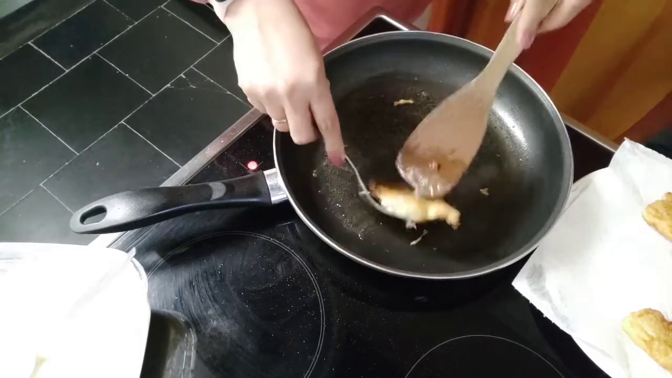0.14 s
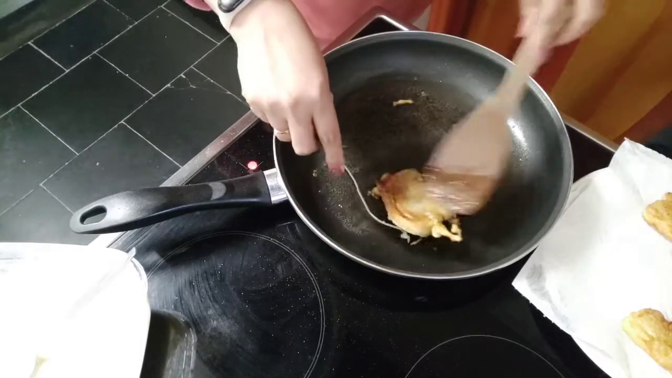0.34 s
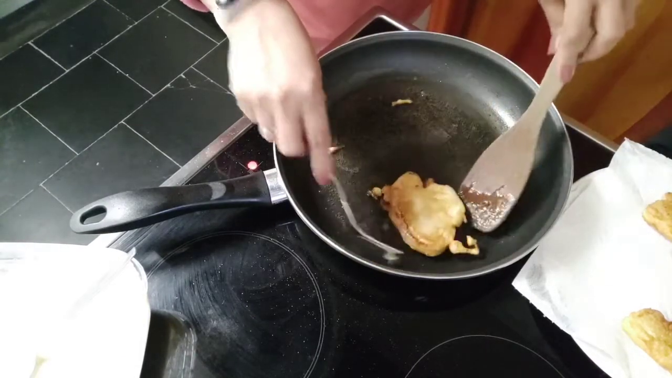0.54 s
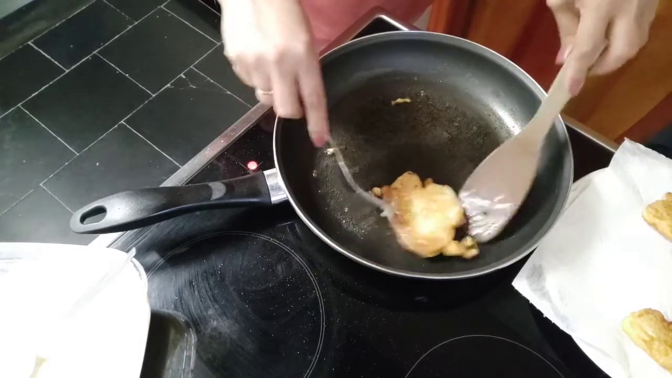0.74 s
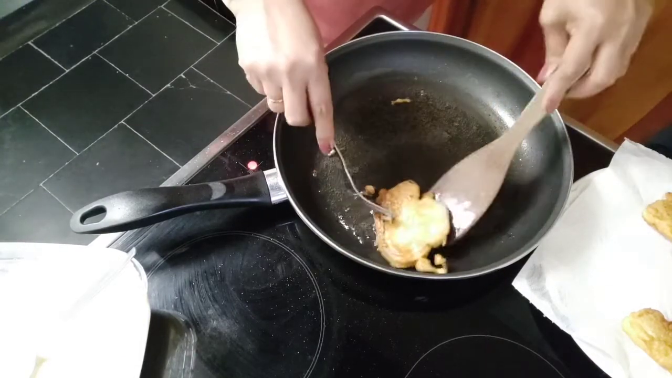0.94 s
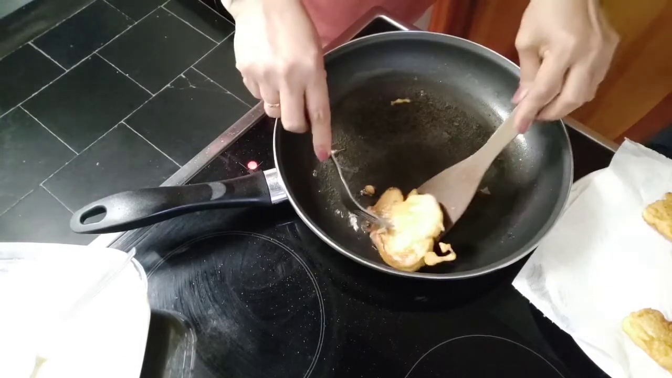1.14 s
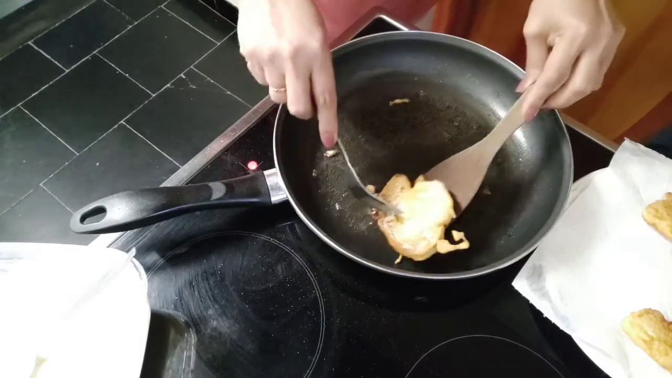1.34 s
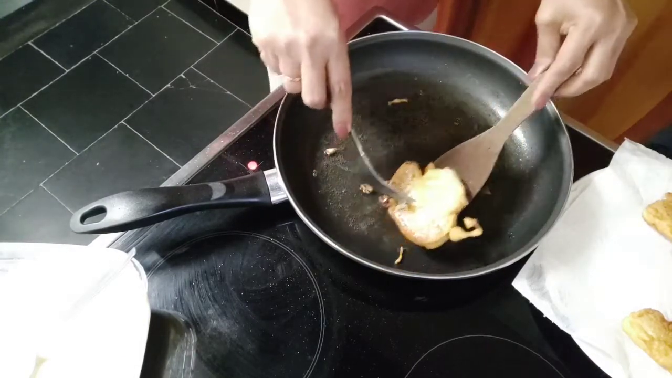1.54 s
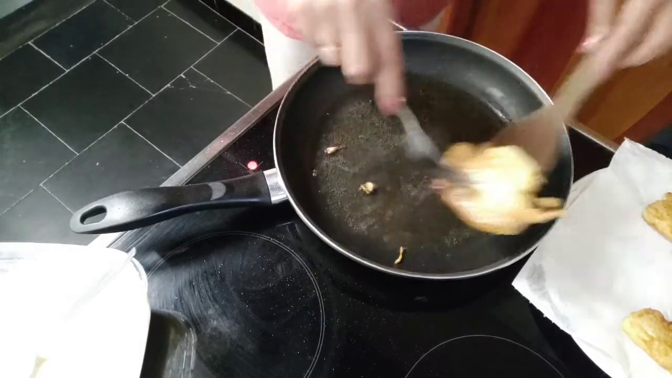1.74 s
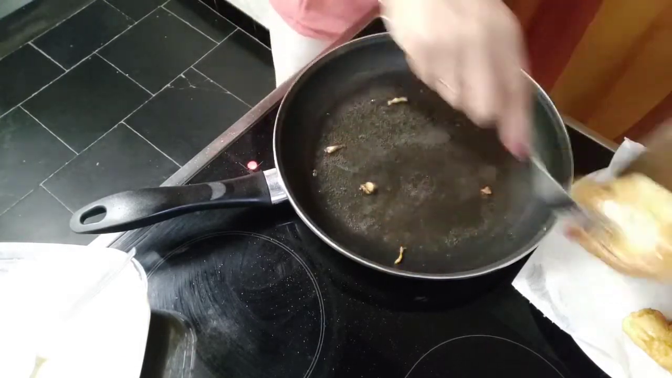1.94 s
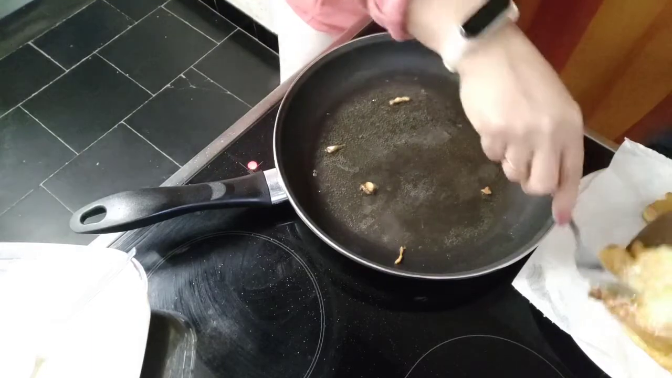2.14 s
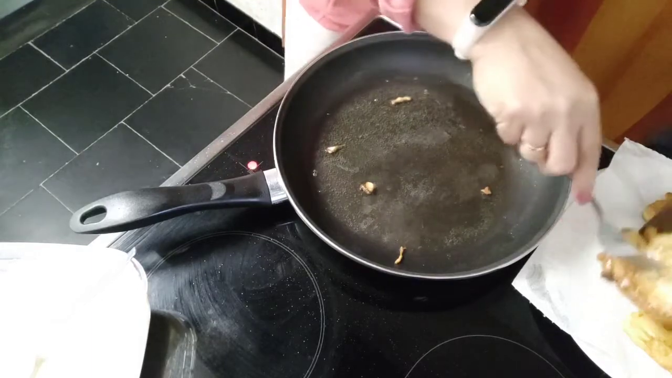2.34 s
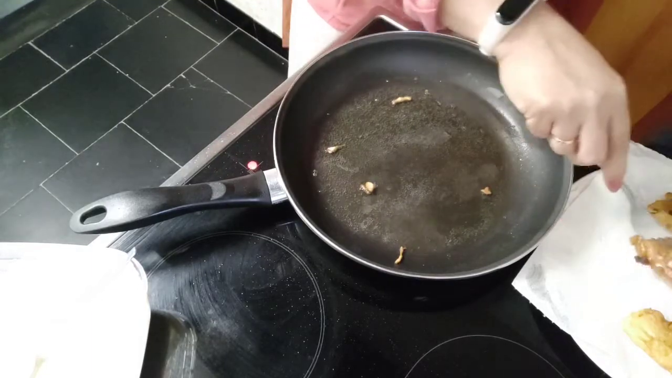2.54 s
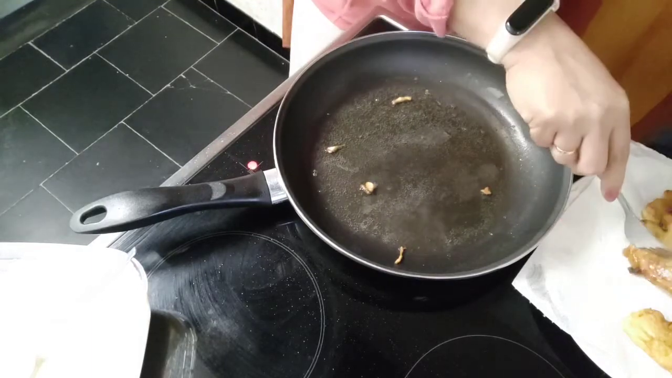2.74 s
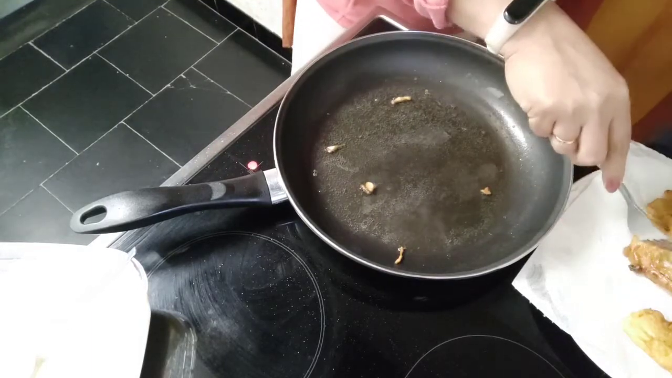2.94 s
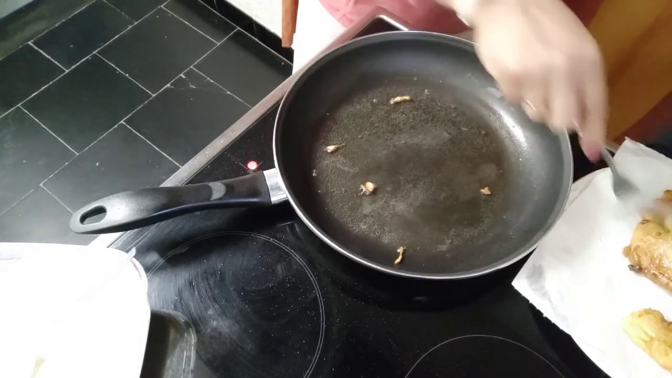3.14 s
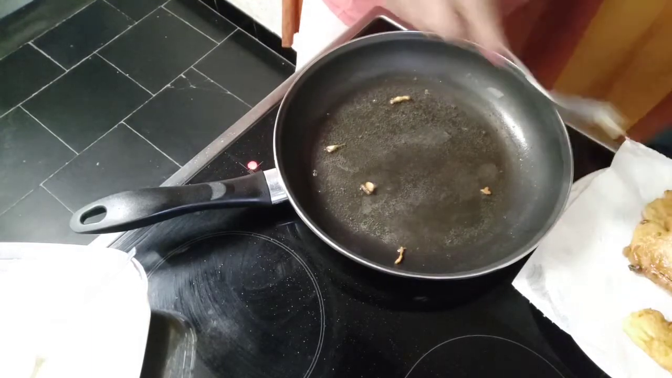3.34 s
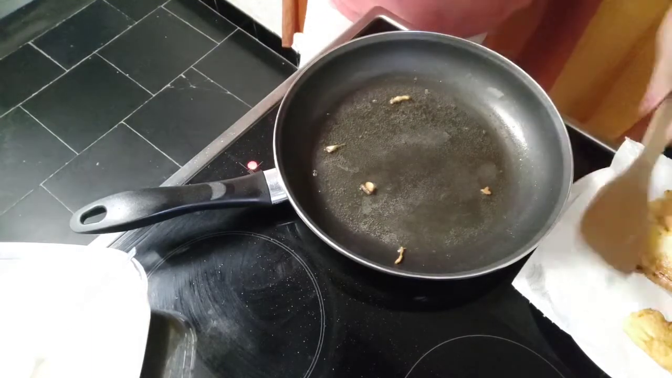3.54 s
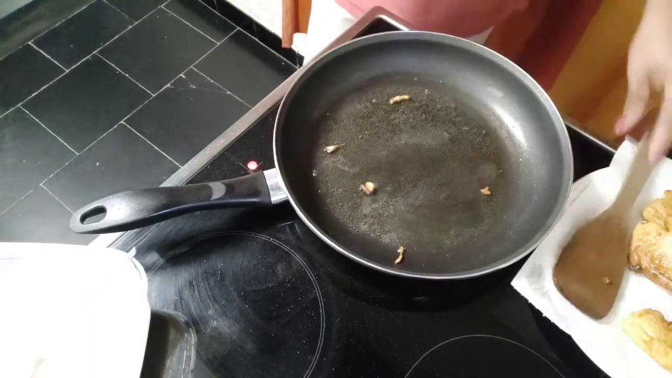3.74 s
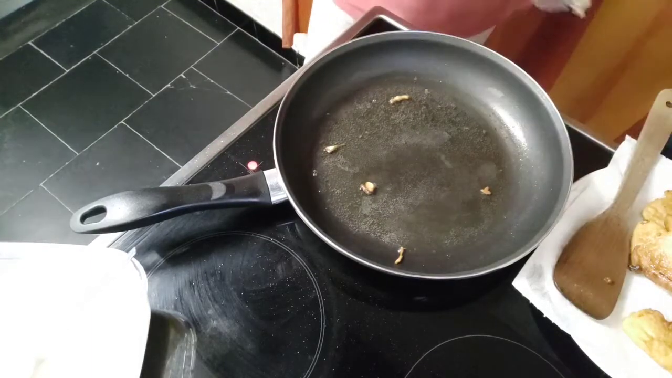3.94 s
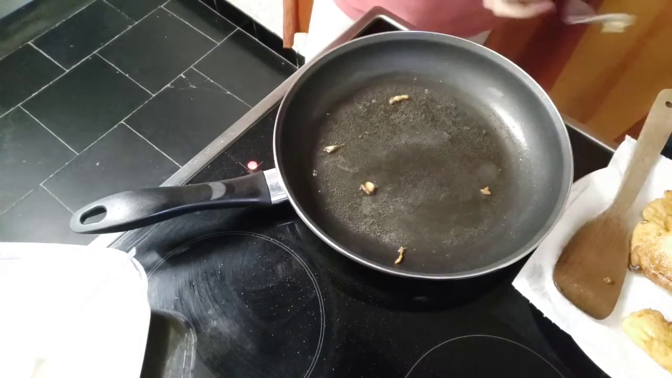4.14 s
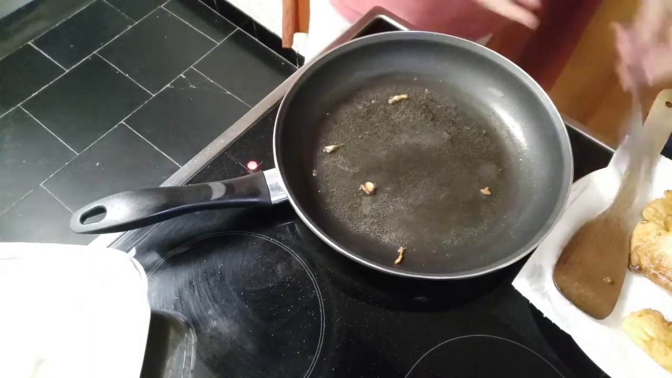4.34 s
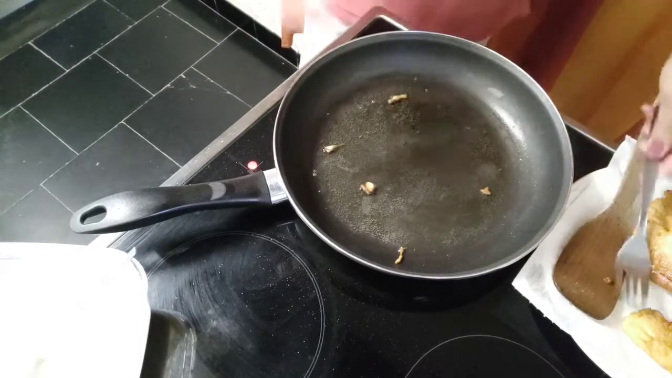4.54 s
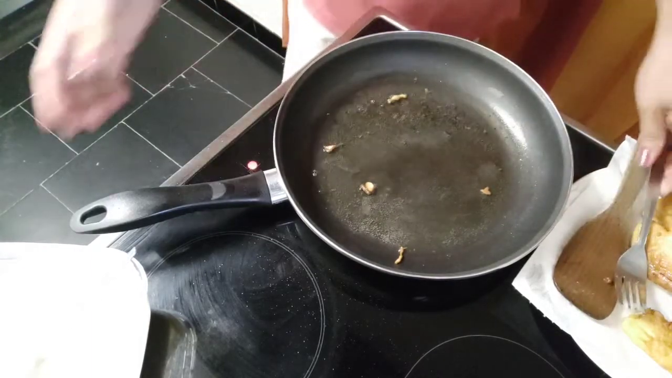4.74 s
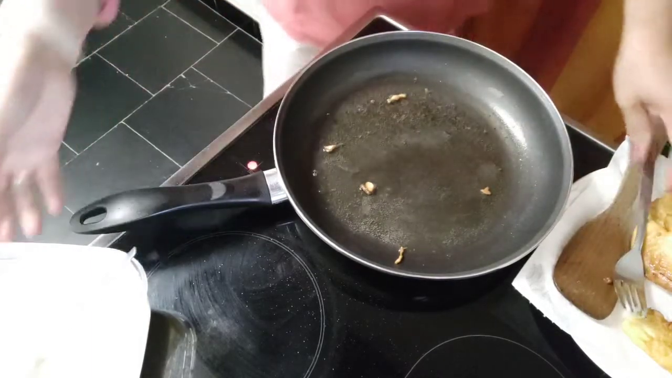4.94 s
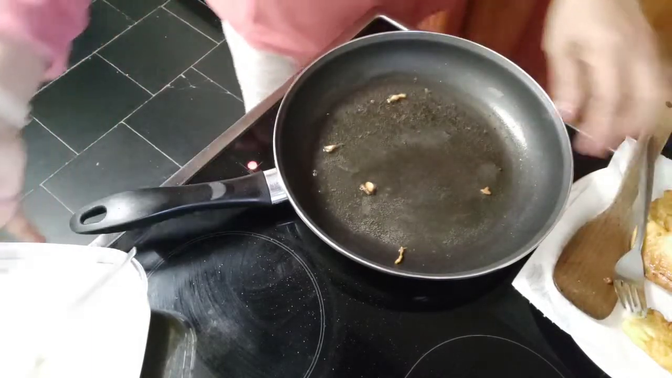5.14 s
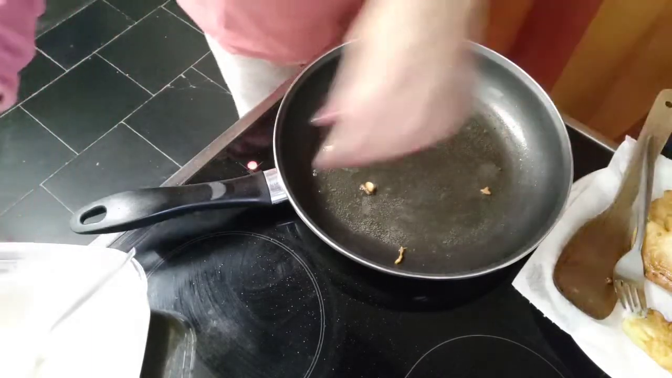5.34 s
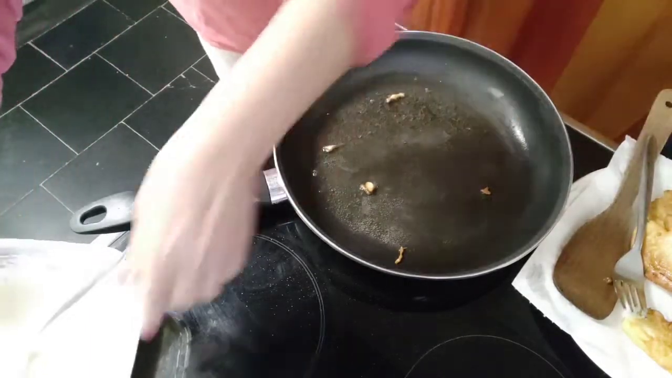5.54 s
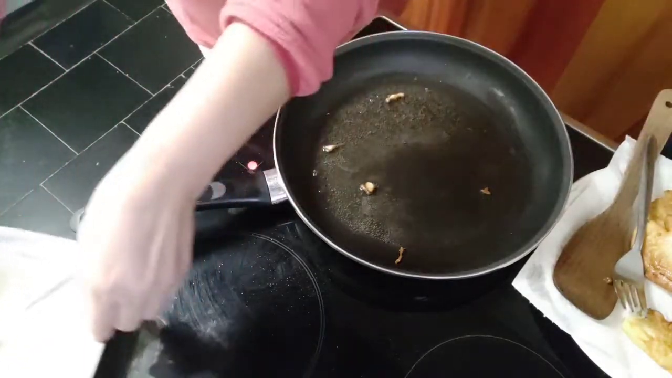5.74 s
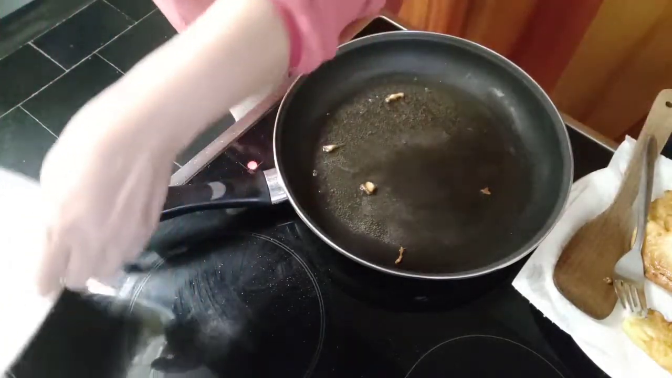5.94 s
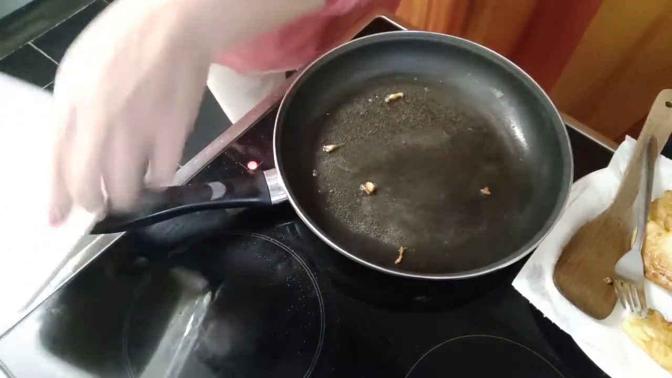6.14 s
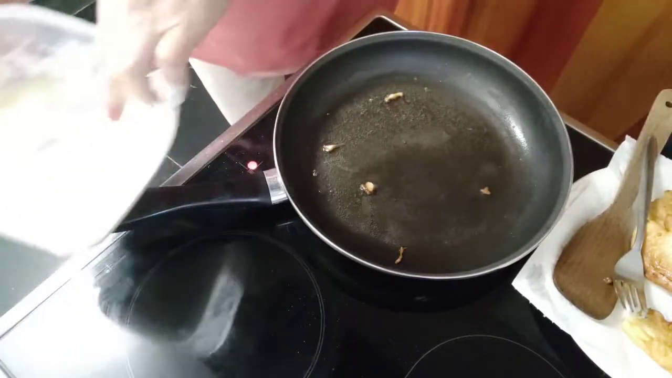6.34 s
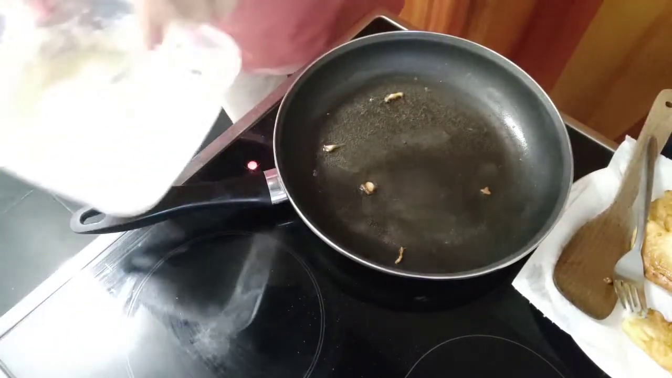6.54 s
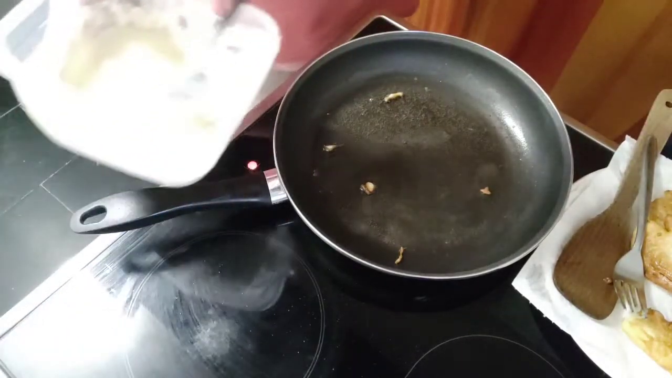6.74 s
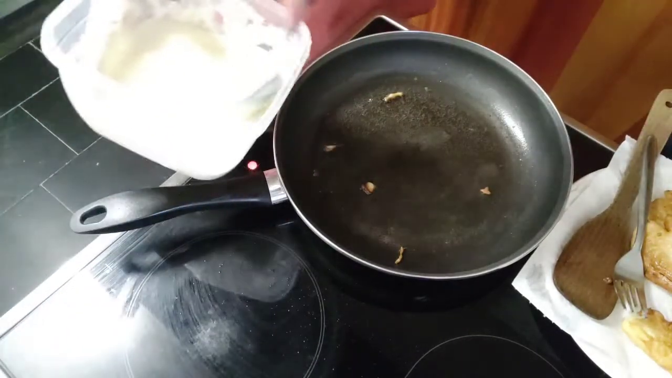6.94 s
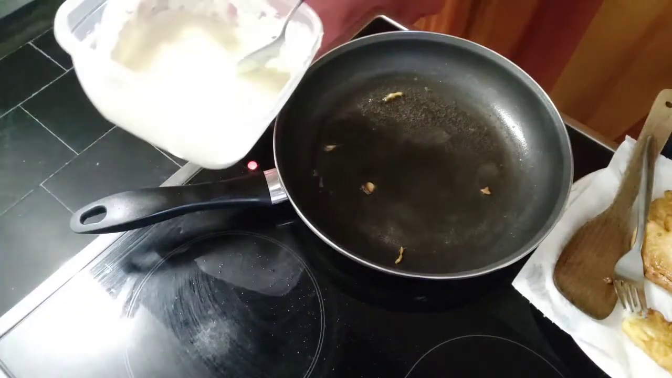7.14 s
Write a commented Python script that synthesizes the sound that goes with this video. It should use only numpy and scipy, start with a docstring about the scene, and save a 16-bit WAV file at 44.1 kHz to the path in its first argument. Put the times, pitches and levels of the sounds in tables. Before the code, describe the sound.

Lively oil sizzle with strong spits in the first second and a half, then steadily fading to a faint fizz. Crust rustles drily on kitchen paper. Woody double knock, a hard short clack, a bright fork clink with a very high ring, and finally quiet sleeve brushing and dull plastic knocks. Heard close by a phone in a small, lightly reverberant kitchen with quiet air and low hum.

```python
"""A battered fritter sizzles in a thin film of oil as flurries of tiny bubble rings, with pops and crackles.
It is lifted onto kitchen paper, where it rustles as dry ticks; the emptied pan spits and calms.
A wooden spatula and a fork are laid down as ringing modes over contact noise, then a plastic bowl is picked up.
A phone hears it from just above the hob, in a small tiled kitchen of soft filtered noise and a faint sine hum."""
import sys
import numpy as np
from scipy import signal
from scipy.fft import rfft, irfft
from scipy.io import wavfile
from scipy.ndimage import uniform_filter1d

SR = 44100
rng = np.random.default_rng(int(sys.argv[2]) if len(sys.argv) > 2 else 0)


def bounce(signal):
    """Save signal as a 16-bit WAV file at the path given by the first command-line argument."""
    frames = np.transpose(np.atleast_2d(signal))
    limited = np.clip(frames, -1, 1)
    pcm = np.round(limited * 32767).astype(np.int16)
    wavfile.write(sys.argv[1], SR, pcm)


N = 317079  # samples
TIME = np.arange(N) / SR
BRIEF = TIME[:16384]  # time axis of single sounds and of the room response


def undb(db):
    """Decibels to gain."""
    return 10 ** (np.asarray(db) / 20)


def unit(x):
    """Scale to rms 1."""
    return x / np.sqrt(np.mean(x ** 2))


def fade(t, t60):
    """Exponential decay by 60 dB in t60 seconds."""
    return np.exp(-np.log(1000) * t / t60)


def walk(rate):
    """Random drift with a spread near 1, taking so many new values per second."""
    return np.interp(TIME * rate, np.arange(4096), rng.standard_normal(4096))


def on_log_axis(points, hz):
    """Read (pitch_hz, value) points at the given frequencies."""
    f, value = np.transpose(points)
    return np.interp(np.log(hz + 1), np.log(f), value)


def colour(x, points, tilt=0, order=4096):
    """Minimum-phase filter with the given (pitch_hz, level_db) shape, tilted in dB per octave about 1 kHz."""
    hz = np.arange(order // 2 + 1) * SR / order
    db = on_log_axis(points, hz) + tilt * np.log2(np.maximum(hz, 300) / 1000)
    # folding the cepstrum makes the filter causal
    cepstrum = irfft(np.log(undb(db)))
    cepstrum[1:order // 2] *= 2
    cepstrum[order // 2 + 1:] = 0
    impulse = irfft(np.exp(rfft(cepstrum)))
    return signal.fftconvolve(x, impulse)[:len(x)]


def grains(spread_db, t60, count):
    """A swarm of tiny rings at random pitches; a positive spread makes a few stand out, a negative one recede."""
    when, pitch, luck = rng.random((count, 3)).T[:, :, None]
    size = undb(-spread_db * np.log(np.maximum(luck, .004)))
    k = np.arange(72)  # samples in each ring
    rings = size * np.sin(np.pi * pitch * k) * fade(k / SR, t60)
    places = (when * N).astype(int) + k
    return unit(np.bincount(places.ravel(), rings.ravel(), N)[:N])


def strokes(rows, attack_s, sag_db_per_s, release_t60):
    """Gain over time of (start_s, held_s, level_db) rows: each rises, sags and, once let go, dies away."""
    power = 0
    for s, held, db in rows:
        age = np.maximum(TIME - s, 0)
        rise = np.minimum(age / attack_s, 1)
        sag = undb(db - sag_db_per_s * age)
        release = fade(np.maximum(age - held, 0), release_t60)
        power = power + (rise * sag * release) ** 2
    return np.sqrt(power)


def add(track, s, db, sound):
    """Place a stereo sound at time s; its peak is taken as twice the rms of its loudest 4 ms."""
    i = int(s * SR)
    peak = 2 * np.sqrt(uniform_filter1d(sound.mean(axis=0) ** 2, size=176).max())
    track[:, i:i + len(BRIEF)] += (undb(db) / peak * sound)[:, :N - i]


# Wet batter pressed or nudged onto hot metal: start_s, held_s, level_db (before the sizzle's trim)
PRESSES = [(0.012, 0.13, -37.5), (.226, 0.045, -31.5), (.281, 0.099, -29.5), (.4, 0.188, -36.5),
           (.61, 0.075, -41), (.845, 0.073, -41), (1.06, 0.23, -50)]


def steam():
    """Strength of the boiling: the film drying as its water boils off, the fritter until lifted, the presses."""
    film = undb(-49.5 - 4.5 * TIME)  # calms by 4.5 dB per second
    lift_s = 1.21
    fritter = undb(-45.5) * fade(np.maximum(TIME - lift_s, 0), 1.6)
    surges = strokes(PRESSES, attack_s=0.0052, sag_db_per_s=16, release_t60=0.043)
    return np.sqrt(film ** 2 + fritter ** 2 + surges ** 2)


# Tone of the frying oil: pitch_hz, level_db
OIL_COLOUR = [(120, -60.5), (200, -31.5), (365, -36), (430, -22), (923, -17), (1070, -22.5), (1510, -11.5),
              (1620, -14), (1980, -8.5), (2650, -9), (6130, -3.5), (7620, -10), (13900, -22),
              (15500, -36.5)]


def sizzle(heat):
    """Countless steam bubbles burst at the left and right of the pan, in uneven flurries."""
    out = 0
    for lag in (-2, 2):
        flurries = undb(2.7 * walk(110))
        bubbles = grains(spread_db=3.5, t60=0.0016, count=12000) * flurries
        oil = unit(colour(bubbles, OIL_COLOUR))
        out = out + kitchen(oil * heat, pan_db=1, near_db=0.5, room_db=4.0, lag=lag)
    return out * undb(-4.5)


# Tone of a bubble's snap: pitch_hz, level_db
SNAP_COLOUR = [(200, -38), (1000, -18.5), (2200, -13), (6500, 3), (8000, -19.5), (15500, -32.5)]


def snaps(heat):
    """Larger bubbles snap open in spatters; the thin film limits their size, here by soft clipping."""
    spatters_per_s, biggest_db = 170, -18  # the ceiling applies before the tone and the final gain
    count = int(spatters_per_s * N / SR)
    when, size = rng.random((count, 2)).T
    seeds = np.bincount((when * N).astype(int), size, N)
    spatters = signal.fftconvolve(seeds, fade(BRIEF, 0.02))[:N]
    ticks = unit(grains(spread_db=2.0, t60=0.0012, count=7000) * spatters)
    ticks = ticks * undb(3) * heat ** 1.15  # snaps fade faster than the sizzle
    ticks = undb(biggest_db) * np.tanh(ticks / undb(biggest_db))
    return undb(4) * kitchen(colour(ticks, SNAP_COLOUR), pan_db=1.5, near_db=-2, room_db=-6)


# Loudest water drops bursting in the oil: start_s, peak_db, pitch_hz (of the cavity as it opens)
POPS = [(0.082, -24.5, 4730), (0.1271, -22, 4220), (0.2831, -9.5, 5740), (0.3153, -20, 6200),
        (0.355, -22, 5860), (0.396, -29, 5500), (0.51, -25, 5500), (0.5444, -20, 3520),
        (0.5777, -23.5, 3260), (0.689, -38.5, 6640), (0.9465, -33, 6300), (0.971, -30.5, 5800),
        (1.0258, -21.5, 4960), (1.046, -28, 5000), (1.08, -34, 5350), (1.1308, -30.5, 4800),
        (1.1829, -23.5, 4450), (1.209, -28.5, 5500), (1.305, -34.5, 6500), (1.4352, -27, 6130),
        (1.775, -43, 4700), (1.81, -37, 5270), (1.993, -32.5, 5500), (2.024, -37, 5420),
        (2.0519, -31.5, 3700), (2.097, -50, 4220), (2.1076, -31.5, 6200), (2.185, -39, 4500),
        (2.2141, -31, 5050), (2.3376, -36, 6260), (2.561, -31, 5070)]


def pops():
    """A drop flashes to steam: the film snaps and the cavity rings, rising as the oil closes over it."""
    track = np.zeros((2, N))
    rise_per_s = 20  # share of the starting pitch
    band = signal.butter(3, [1500, 7200], "band", fs=SR, output="sos")
    for s, db, hz in POPS:
        cycles = hz * BRIEF * (1 + rise_per_s * BRIEF / 2)
        cavity = np.sin(2 * np.pi * cycles) * fade(BRIEF, 0.008)
        cavity = signal.sosfilt(band, cavity)
        snap = colour(rng.standard_normal(len(BRIEF)) * fade(BRIEF, 0.0035), SNAP_COLOUR)
        pop = unit(cavity) + undb(-5) * unit(snap)
        add(track, s, db, kitchen(pop, pan_db=2.0, near_db=5.0, room_db=-0.5))
    return track


# Loudest dry crackles of crust and oil: start_s, peak_db, tilt_db_per_octave
CRACKLES = [(0.0221, -23.5, 0), (0.0484, -25, -1.5), (0.094, -28, 2), (0.245, -26, 0), (0.2795, -19.5, 0.5),
            (0.462, -27.5, 5), (1.595, -39.5, -2), (1.664, -38, -1), (1.9335, -31, 3), (2.6298, -48, 2),
            (2.6977, -41, 6), (2.7587, -31.5, 0), (2.8784, -35, 0.5), (2.994, -40.5, -2), (3.143, -35, 2),
            (3.244, -43.5, 10), (3.3269, -44, 1), (3.359, -46, 2.5), (3.41, -45, 2.5), (3.475, -44, 4.5),
            (3.6236, -38.5, -1.5), (5.1546, -48, 0.5)]


def crackles():
    """Each crackle is a quick cluster of tiny fractures: spiky noise dying away in milliseconds."""
    track = np.zeros((2, N))
    on_paper_s = 2.4  # from here the crust crackles on the paper, off to the left
    for s, db, tilt in CRACKLES:
        fractures = rng.laplace(size=len(BRIEF)) * fade(BRIEF, 0.013)
        crackle = colour(fractures, OIL_COLOUR, tilt)
        lag, pan_db = (9, 4.5) if s > on_paper_s else (0, 1)
        add(track, s, db, kitchen(crackle, pan_db=pan_db, near_db=0.5, room_db=-1.5, lag=lag))
    return track


# Tone of rubbed paper: pitch_hz, level_db
PAPER_COLOUR = [(120, -54), (200, -2.5), (240, -11), (371, -18.5), (525, -7.5), (1260, -5), (1650, -3.5),
                (3070, -1), (6590, -2.5), (12900, -18), (15500, -20)]
# Fritter and fork rubbing on the paper: start_s, held_s, level_db (before the paper's trim)
PAPER_RUBS = [(2.59, 0.17, -52), (2.74, 0.22, -54.5), (3.19, 0.11, -56)]


def paper():
    """Crust and fork rub over the paper in uneven swells of dry little ticks."""
    rubbing = strokes(PAPER_RUBS, attack_s=0.042, sag_db_per_s=1.5, release_t60=1)
    ticks = grains(spread_db=3.8, t60=0.0007, count=9000) * undb(2.5 * walk(25))
    rustle = unit(colour(ticks, PAPER_COLOUR)) * rubbing
    return undb(-3.5) * kitchen(rustle, pan_db=0.0, near_db=5.0, room_db=0.0, lag=8)


# Worktop resonances: pitch_hz, level_db, t60_s
WORKTOP_MODES = [(215.4, -13.5, 0.57), (489, 2.5, 0.16), (1165, -0.5, 0.15)]


def utensil(blows, modes, knock, knock_db, worktop_db, **place):
    """Each blow rings the modes over contact noise, both tilted per blow; the worktop booms under it."""
    track = np.zeros((2, N))
    boom = sum(undb(db) * np.sin(2 * np.pi * hz * BRIEF) * fade(BRIEF, t60) for hz, db, t60 in WORKTOP_MODES)
    boom = boom * (1 - np.exp(-BRIEF / 0.006))  # swells in over some milliseconds
    no_bass = signal.butter(2, 200, "high", fs=SR, output="sos")  # a small object radiates no deep bass
    for s, db, tilt, t60 in blows:
        ring = 0
        for hz, mode_db, decay in modes:
            gain = undb(mode_db + tilt * np.log2(hz)) * rng.choice([-1, 1])
            ring = ring + gain * np.sin(2 * np.pi * hz * BRIEF) * fade(BRIEF, decay)
        ring = signal.sosfilt(no_bass, ring)
        contact = colour(rng.laplace(size=len(BRIEF)) * fade(BRIEF, t60), knock, tilt)
        blow = unit(ring) + undb(knock_db) * unit(contact)
        add(track, s, db, kitchen(blow, **place))
        add(track, s, db + worktop_db, np.array([boom, boom]))
    return track


# Spatula blows: start_s, peak_db, tilt_db_per_octave, contact_t60_s
SPATULA_BLOWS = [(.610, -36, 1, 0.1), (.771, -34, 3, 0.14), (2.3, -55, -4.5, 0.05),
                 (3.04, -52, -4.5, 0.078), (3.716, -29, -3.5, 0.011), (3.7201, -33, 3, 0.0059),
                 (3.849, -33, -4.5, 0.013), (3.8572, -32.5, 0.5, 0.024), (3.8777, -38, -12.5, 0.0046),
                 (3.908, -49, 4, 0.022)]
# Resonances of the spatula: pitch_hz, level_db, t60_s
SPATULA_MODES = [(480, 8.5, 0.085), (790, 23, 0.0083), (1236, 9.5, 0.026), (1760, 13, 0.011),
                 (2470, 21, 0.0097)]
# Tone of its contact noise: pitch_hz, level_db
SPATULA_KNOCK = [(60, -21.5), (140, -18), (215, -11.5), (400, -6.5), (1250, -6), (1500, -14), (2100, -19),
                 (2550, -15.5), (3050, -30.5), (4200, -22.5), (6000, -34), (15000, -63.5)]


def spatula():
    """The wooden spatula knocks with short, woody modes."""
    return utensil(SPATULA_BLOWS, SPATULA_MODES, SPATULA_KNOCK, knock_db=-7.5, worktop_db=-12.0,
                   pan_db=1.0, near_db=2.5, room_db=-3, lag=9)


# The spatula scraping in under the fritter: start_s, held_s, level_db
SCRAPES = [(0.16, 0.081, -60), (0.8, 0.25, -63)]


def scrapes():
    """Wood catches and slips on the pan: a dull, grainy rasp."""
    pushing = strokes(SCRAPES, attack_s=0.027, sag_db_per_s=0, release_t60=0.15)
    rasp = unit(colour(grains(spread_db=2.5, t60=0.002, count=5000), SPATULA_KNOCK))
    return kitchen(rasp * pushing, pan_db=-1.5, near_db=2.5, room_db=-2)


# Fork blows: start_s, peak_db, tilt_db_per_octave, contact_t60_s
FORK_BLOWS = [(4.900, -29.5, 0, 0.016), (4.9025, -16, 1, 0.012), (4.913, -24.5, -2, 0.14),
              (4.934, -38, 0, 0.035)]
# Resonances of the fork: pitch_hz, level_db, t60_s
FORK_MODES = [(2360, -7, 0.04), (4600, 3, 0.028), (4810, 2, 0.039), (5405, 9, 0.03), (6040, 3, 0.022),
              (7540, -6, 0.055), (9420, -15, 0.061)]
# Tone of its contact noise: pitch_hz, level_db
FORK_KNOCK = [(130, -19), (215, -2.5), (320, -10.5), (520, -2), (1400, -12.5), (2300, 9), (3100, -1.5),
              (5200, 5), (7800, -8), (8400, -11), (11800, -11), (13000, -43)]


def fork():
    """The fork is laid down with a cluster of bright metal modes."""
    return utensil(FORK_BLOWS, FORK_MODES, FORK_KNOCK, knock_db=-2.0, worktop_db=-25,
                   pan_db=1.5, near_db=2.5, room_db=-5.5, lag=8)


def tines():
    """The steel tines sing two very high notes; no two tines are quite alike, so the notes beat."""
    ring = 0
    for hz, gain in [(11602, 1), (14833, undb(-3))]:
        for stretch, share in [(1, 1), (1.003, .25)]:  # the slightly sharper tine is weaker
            ring = ring + gain * share * np.sin(2 * np.pi * hz * stretch * BRIEF)
    ring = ring * fade(BRIEF, 0.1)
    track = np.zeros((2, N))
    # the fork lands on its tines at 4.9 s
    add(track, 4.9, -30, kitchen(ring, pan_db=2, near_db=-14, room_db=-14, lag=7))
    return track


# Fork against the spatula's handle: start_s, peak_db, tilt_db_per_octave, contact_t60_s
CLACK_BLOWS = [(4.6305, -19.5, 6, 0.013), (4.6326, -19.5, -6, 0.0053), (4.9205, -26.5, -5.5, 0.032)]
# Resonances of the wooden handle: pitch_hz, level_db, t60_s
HANDLE_MODES = [(1632, -23, 0.069), (1908, -3, 0.033), (2354, 10, 0.033), (2378, 11, 0.013),
                (3500, -1.5, 0.016), (4590, -5.5, 0.023)]
# Tone of its contact noise: pitch_hz, level_db
HANDLE_KNOCK = [(100, -54), (800, -38), (1250, -9), (2350, 12), (3000, -7), (6500, -5.5), (8000, -25),
                (15000, -55)]


def clack():
    """The fork strikes the spatula's wooden handle, which answers with a short clack of wood modes."""
    return utensil(CLACK_BLOWS, HANDLE_MODES, HANDLE_KNOCK, knock_db=-4.0, worktop_db=-29,
                   pan_db=3.0, near_db=-4.5, room_db=-7.5, lag=5)


# Bowl blows: start_s, peak_db, tilt_db_per_octave, contact_t60_s
BOWL_BLOWS = [(5.591, -45.5, -13, 0.25), (6.3715, -34, -2, 0.02), (6.403, -34.5, -2, 0.016),
              (6.483, -46.5, -13, 0.031), (6.544, -45, 0, 0.13)]
# Resonances of the plastic bowl: pitch_hz, level_db, t60_s
BOWL_MODES = [(590, -3.5, 0.028), (760, 5.5, 0.019), (843, 8.5, 0.05), (1520, 5, 0.021)]
# Tone of its contact noise: pitch_hz, level_db
BOWL_KNOCK = [(150, -26), (210, -16), (600, 2.5), (830, 6), (1150, -26), (1550, -8.5), (2700, -12),
              (4300, -10), (6700, -13), (8500, -22), (15000, -61)]
# Sleeve and hand brushing past: start_s, held_s, level_db
BRUSHES = [(5.328, 0.022, -55.5), (5.55, 0.031, -63.5), (5.668, 0.0086, -53), (5.76, 0.016, -65.5),
           (6.76, 0.022, -65)]
# The bowl sliding under the hand: start_s, held_s, level_db
SLIDES = [(6.15, 0.049, -60.5), (6.36, 0.053, -52.5)]


def bowl():
    """A sleeve brushes past; the bowl scuffs over the worktop and knocks as it is lifted."""
    brushing = strokes(BRUSHES, attack_s=0.0037, sag_db_per_s=51, release_t60=0.24)
    sliding = strokes(SLIDES, attack_s=0.027, sag_db_per_s=35, release_t60=0.15)
    cloth = grains(spread_db=-1, t60=0.0016, count=9000)
    brush = unit(colour(cloth, PAPER_COLOUR, tilt=-2.5)) * brushing
    plastic = grains(spread_db=1.5, t60=0.002, count=9000)
    scuff = unit(colour(plastic, BOWL_KNOCK, tilt=0.3)) * sliding
    knocks = utensil(BOWL_BLOWS, BOWL_MODES, BOWL_KNOCK, knock_db=-4.5, worktop_db=-33,
                     pan_db=0.0, near_db=5.5, room_db=-8.5, lag=-9)
    return knocks + kitchen(brush + scuff, pan_db=-0.5, near_db=11.0, room_db=9.0)


def ports(mid, side, apart_hz=750):
    """Two nearby microphones hear diffuse sound alike in the bass and unlike in the treble."""
    side = signal.sosfilt(signal.butter(1, apart_hz, "high", fs=SR, output="sos"), side)
    return np.array([mid + side, mid - side])


# Reverberation of the tiled room: pitch_hz, t60_s
ROOM_T60 = [(200, 0.9), (600, 0.32), (2500, 0.18), (7000, 0.17), (15000, 0.22)]


def kitchen(x, pan_db, near_db, room_db, lag=0):
    """Direct sound (left earlier by lag samples), quick echoes off pan and hob, then the tiled room."""
    hz = np.arange(len(BRIEF) // 2 + 1) * SR / len(BRIEF)
    centres, t60s = np.transpose(ROOM_T60)
    # cubed noise gives sparse, distinct echoes
    near = ports(*rng.standard_normal((2, len(BRIEF))) ** 3) * fade(BRIEF, 0.024) * (BRIEF > .0006)
    diffuse = rfft(ports(*rng.standard_normal((2, len(BRIEF)))))
    tail = 0
    for share, t60 in zip(np.eye(len(t60s)), t60s):  # each band dies away at its own pace
        band = irfft(diffuse * np.interp(hz, centres, share))
        tail = tail + band * fade(BRIEF, t60)
    tail = tail * (BRIEF > .005)
    response = sum(undb(db) * part / np.linalg.norm(part[0]) for db, part in [(near_db, near), (room_db, tail)])
    response[0, max(0, -lag)] += 1
    response[1, max(0, lag)] += 1
    pan = undb(np.array([[pan_db], [-pan_db]]) / 2)  # positive leans left
    response *= pan / np.linalg.norm(response.mean(axis=0))
    return signal.fftconvolve(x[None], response, axes=1)[:, :len(x)]


# Tone of the room air: pitch_hz, level_db
AIR = [(25, -15.5), (64, -24), (120, -8), (170, -22.5), (230, -11), (380, -17), (550, -8.5), (830, -14),
       (1150, -17.5), (2100, -16.5), (4000, -22), (6700, -19.5), (7700, -26.5), (15500, -31)]
# Hum of the hob and other appliances: pitch_hz, level_db (centre of its wavering), start_s
HUM = [(116, -92, 3.5), (244.3, -77, 0), (102, -81.5, 5.5)]


def background():
    """Soft room air as filtered noise, and a hum of sines wavering in level and phase."""
    mid, side = (unit(colour(rng.standard_normal(N), AIR)) for _ in range(2))
    air = undb(-69.5) * ports(mid, side, apart_hz=900.5)
    hum = 0
    for hz, db, on in HUM:
        level = undb(db + 2.0 * walk(2.7)) * np.sqrt(2)  # rms to sine peak
        switch = np.clip((TIME - on) / 0.011, 0, 1)
        hum = hum + level * np.sin(2 * np.pi * hz * TIME + 1.2 * walk(3.4)) * switch
    return air + hum


def scene():
    """The pan lies under the phone, the paper to one side and the bowl to the other."""
    heat = steam()
    frying = sizzle(heat) + snaps(heat) + pops() + crackles()
    serving = paper() + scrapes()
    laid_down = spatula() + clack() + fork() + tines()
    return frying + serving + laid_down + bowl() + background()


def record(dry):
    """The phone cuts the top with a steep low-pass at 15.9 kHz."""
    return signal.sosfilt(signal.ellip(10, .2, 70, 15900, fs=SR, output="sos"), dry)


dry = scene()
out = record(dry)
bounce(out)
```